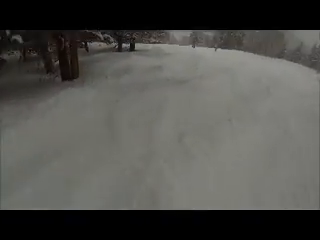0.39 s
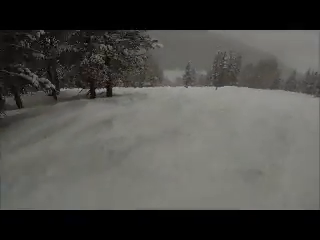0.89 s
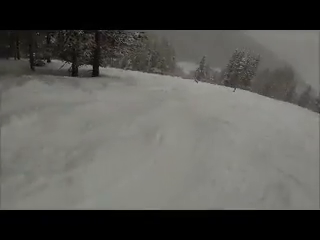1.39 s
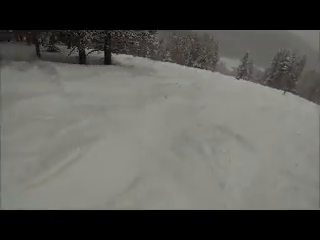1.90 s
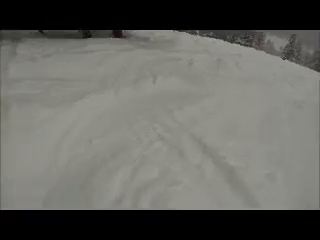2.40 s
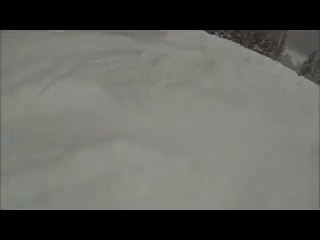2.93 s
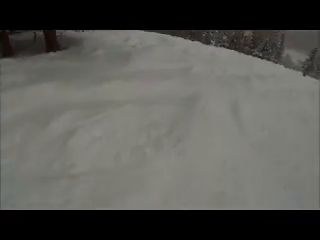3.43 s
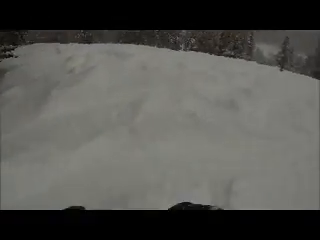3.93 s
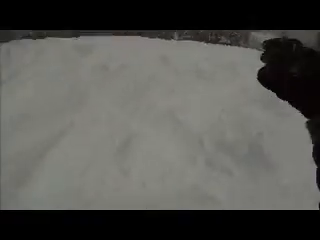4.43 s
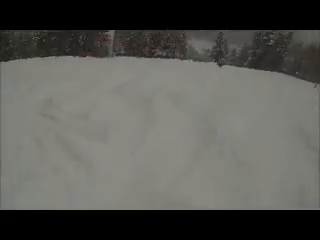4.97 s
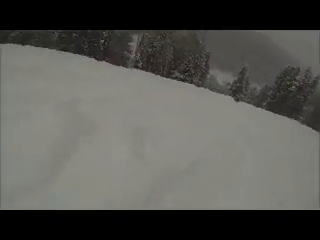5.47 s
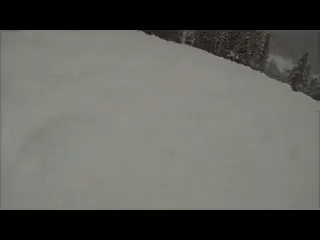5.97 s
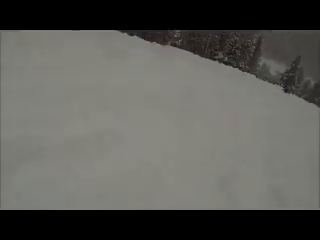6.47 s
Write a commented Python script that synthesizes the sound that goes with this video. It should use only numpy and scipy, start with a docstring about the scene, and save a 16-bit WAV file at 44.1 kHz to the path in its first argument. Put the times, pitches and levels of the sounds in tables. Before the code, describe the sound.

Faint boxy snow hiss and crackling flake ticks under low wind rumble, broken by a hard plastic knock and a later heavy thud.

```python
"""A rider slides down a soft slope in falling snow, heard by a helmet camera shut in a plastic housing.
Throughout, snow hisses as filtered noise, air rumbles as swelling low noise and flakes tick as short bursts.
The ride opens with two jolts in a gust; hard knocks and scrapes follow just after 1 s, and again near 2.9 s.
The strongest jolt, a decaying gliding sine, lands near 4.7 s among scrapes of uneven noise; a light rub follows
near 5.2 s and faint jolts near 6.3 s. The case's resonances colour the ticks, scrapes and hiss."""
import sys
import numpy as np
from scipy import signal
from scipy.fft import rfft, irfft
from scipy.io import wavfile
from scipy.ndimage import uniform_filter1d

SR = 44100
rng = np.random.default_rng(int(sys.argv[2]) if len(sys.argv) > 2 else 0)


def volts_from_decibels(level):
    """Turn decibel levels (scalar or array-like) into linear amplitude factors."""
    exponent = np.asarray(level, float) / 20
    return 10 ** exponent


def store_pcm(level_fs):
    """Save levels as 16-bit WAV."""
    pcm = np.round(np.clip(level_fs, -1, 1) * 32767).astype(np.int16)
    wavfile.write(sys.argv[1], SR, np.atleast_2d(pcm).T)


N = 291060  # samples, 6.6 s

# Relative spectral density of the closed case's response: f/Hz, level/dB [dB per Hz]
CASE_RESPONSE = [(180, -29.5), (300, -3.5), (996, -10), (1310, 4), (1650, -3.5), (2290, 2.5), (3980, -14),
                 (5010, -10), (5660, -20.5), (6020, -35.5), (6310, -20.5), (6920, -15.5), (9700, -13.5),
                 (11000, -18.5), (11800, -98), (15400, -100), (22000, -120)]


def ticks():
    """Impact excitation: each tick is a sharp tap and a short crumble, its hardness setting the ranges rung."""
    # Clear ticks and knocks on the shell: t/s, energy level/dB, low ring/dB and hard edge/dB
    # (both relative to the energy level), crumble time/ms (held to 0.1-4 ms for the crumble)
    clear_ticks = [(.0263, -24, -2, -11, 0.71), (.0415, -21, -21, -9, 1), (.0561, -18.5, -16, -3, .84),
                   (.0687, -19.5, -5, -27, 0.94), (.1473, -21, -26, -23, 2.7), (.191, -24.5, -19, -4, .9),
                   (.2275, -24.5, -13, -8, .76), (.3002, -24.5, -2, -14, 0.76),
                   (.328, -20.5, -14, -19.5, 0.68), (.3775, -37, 11, -24, 1.2), (.4909, -18, -13, -18, .5),
                   (.4975, -22.5, -6, -11, 0.61), (.528, -24.5, -4, -27, 1.4), (.594, -17.5, -4, -25, 2.1),
                   (.6081, -13.5, -6.5, -31, 0.82), (.6674, -22.5, -5, -28, .76),
                   (.7211, -24.5, -1, 2, 1.5), (.745, -18, -29, -5, 1.1), (.802, -19.5, -19, -14, 1.8),
                   (.8523, -16, -8, -37, 0.78), (.87, -26.5, 6, -26, .8), (.9101, -22.5, -5, -7, 1.5),
                   (.9393, -24, -2, 5, 1.05), (.9675, -25, 1, -4, 1.2), (.9823, -22, -2, -19, 2),
                   (1.0337, -20, -8, -7, .55), (1.0374, -19.5, -9, -7.5, 1.2),
                   (1.0648, -13, -18, -21, 0.69), (1.089, -25, 1, -13, 0.96), (1.114, -6.5, -14, -30, 0.75),
                   (1.1222, 1.5, -13, -39, 0.18), (1.1616, 11.2, -11, -25, .27), (1.1648, -3, -8, -14, 1.2),
                   (1.223, -19, -19, -20, .27), (1.243, -19.5, -1.5, -11, 2.2), (1.2855, -10, 6, -25, .78),
                   (1.3121, -25.5, -4, -12, 0.59), (1.3948, -29, -18, -4, 0.55), (1.482, -28, -21, 3, 1.5),
                   (1.5679, -22.5, -11, -8, 0.74), (1.6826, -26.5, -6, -19, .6),
                   (1.7506, -22, -27, -4, .57), (1.763, -22, -27, -26, 0.5), (1.7914, -21, -11, -23, 2.1),
                   (1.808, -19.5, -13, -13, 4.5), (1.8432, -26, -3, 0, 0.77), (1.8927, -28, 3, -3, 1.2),
                   (1.931, -25, -7, 0, 0.95), (1.96, -24, -9, -22, .55), (2.1337, -22, -7, -7, 0.85),
                   (2.151, -17.5, -1, -6.5, 2.5), (2.1879, -28.5, -12, -5, .74),
                   (2.2648, -28, -1, -26, 2.3), (2.3202, -24, -9, -5.5, 1.1), (2.3809, -28, -10, 4.5, .46),
                   (2.51, -20.5, -15, -5.5, 1.8), (2.5336, -22, 6.5, -42, 1.7),
                   (2.6063, -12.5, -15, -32, 1.2), (2.6452, -26.5, -4.5, -15, .42),
                   (2.6744, -28, -18, 0.5, 0.55), (2.9001, -2, 1.5, -44, 0.69), (3.01, -27, -8, -9, 0.68),
                   (3.0677, -22, -18, -23, 0.99), (3.1035, -31, -37, 2.5, .21),
                   (3.1271, -24.5, -36, -3, .57), (3.151, -24.5, -20, 4, 0.71), (3.1636, -25, -20, -7, 1),
                   (3.1709, -19.5, -10, -8, 0.76), (3.1774, -22.5, -20, -7, 0.83),
                   (3.3377, -19, -7.5, -6.5, 1.7), (3.3687, -16.5, -17, -26, 0.9),
                   (3.426, -26, 2.5, -15, 3), (3.434, -20, -16, -5, 1.8), (3.446, -25, -26, -4, 1.2),
                   (3.4527, -24.5, -2, 1, 1.5), (3.487, -25.5, -14, -6, .67), (3.557, -18, -2.5, -5, 0.89),
                   (3.6346, -20.5, -30, -9, 0.51), (3.8359, -28, -1, -5, 1.7),
                   (3.8475, -14, -28, -13.5, 1.1), (3.9159, -29, 0, 3.5, 1.6), (3.926, -34, 14.5, 0, 1.6),
                   (3.9584, -16.5, -15, -10, .8), (3.9724, -27, 1, -.6, 1.1), (4.0319, -27, -21, -12, 1.2),
                   (4.0721, -25.5, -12, -21, 1.1), (4.1144, -25, 3, -38, 1.3), (4.1678, -24, -9, 1, 1.1),
                   (4.2036, -23.5, -8, -43, 1), (4.2723, -15.5, -8, -51, .83), (4.2806, -28, -16, -12, .65),
                   (4.3289, -26, -45, -26, 0.84), (4.3621, -12, -11.5, -12.5, 3.4),
                   (4.4042, -15.5, -9.5, -16, 1), (4.4493, -21.5, -8, -9, 1.4), (4.4761, -20, -11, -11, .2),
                   (4.4798, -23.5, 10.5, -18, 1), (4.5574, -26, -19, -12, .7),
                   (4.5851, -17.5, -10, -30, 1.1), (4.605, -8, 2.5, -30, .36), (4.757, -39.5, -7, 12.5, .9),
                   (4.7768, -16, -8, -15, 1.4), (4.8164, -22.5, -23, -2, 0.64),
                   (4.832, -24.5, -26, -22, 1.5), (4.959, -34, -11, -17, 1.2), (5.0054, -31, -8, -15, 1.2),
                   (5.0132, -31.5, -11, 1, 0.62), (5.105, -30.5, -14, -13, .95),
                   (5.1868, -32.5, -2, -3.5, .9), (5.2191, -35, -10, 8, 1.5), (5.23, -18, -11, -11, 1.6),
                   (5.241, -24.5, -17, -3, 0.39), (5.2895, -27, -12, -5, 2.2), (5.3113, -22, -7, -12, 0.43),
                   (5.3325, -22.5, -16, -14, .43), (5.363, -29, -17, -1, .3), (5.4162, -32, -6, -3, .74),
                   (5.4371, -20.5, -8, -19, .97), (5.5217, -27.5, -4.5, -8, 1.1),
                   (5.6176, -26, -1, -5, 1.1), (5.6325, -25, -7, -4, 0.24), (5.653, -16, -26, -22, 1.16),
                   (5.7401, -20, -9, -15, 1.2), (5.8615, -19.5, -23.5, -17, 1.5),
                   (5.894, -25.5, -5, -2, 1.2), (5.92, -29, -10, -4, 1.6), (5.959, -27, -12, -22, 1.3),
                   (6.1394, -19.5, -26, -25, 0.49), (6.3, -24, 4, -52, 1.6), (6.3148, -33, 16, -27, .84),
                   (6.375, -26.5, 11.5, -27, 1.3), (6.3905, -11.5, -16, -30, 0.82),
                   (6.3993, -21, -14, 3, 0.26), (6.4126, -19.5, -18, -11, .76),
                   (6.4637, -20.5, -15, -17, 0.49), (6.5467, -24, -13, -19, 0.82),
                   (6.5576, -27, 2, 1.5, 0.26)]
    start_s, energy_db, low_db, edge_db, length_ms = np.vstack([clear_ticks, flakes()]).T[:, :, None]
    # Soft, weak blows carry more dull thud
    dull_db = -17.5 + 0.83 * low_db - 0.43 * energy_db

    k = np.arange(512)
    t = 1000 * k / SR / np.clip(length_ms, 0.1, 4)  # in crumble times
    crumble = rng.standard_normal(t.shape) * t * np.exp(-t)
    crumble = crumble / np.linalg.norm(crumble, axis=1, keepdims=True)
    even_split_ms = 0.73  # shorter ticks are mostly one sharp tap
    tap_share = 1 / (1 + (length_ms / even_split_ms) ** 2)  # of the energy
    burst = np.sqrt(1 - tap_share) * crumble + np.sqrt(tap_share) * (k == 8)

    # Bursts begin 36 samples ahead of their listed times
    where = np.clip((start_s * SR).astype(int) + k - 36, 0, N - 1)
    gains = range_gains(energy_db, dull_db, low_db, edge_db)
    return ring([np.bincount(where.ravel(), (g * burst).ravel(), N) for g in gains])


def flakes():
    """Poisson-like scatter: fainter ticks at independent random moments, strengths, colours and lengths."""
    flakes_per_s = 45
    count = int(flakes_per_s * N / SR)
    start_s = rng.random(count) * N / SR
    strength, low, edge, length = rng.standard_normal((4, count))
    energy_db = -34.5 + 3.5 * strength
    low_db = -8.5 + 6 * low
    edge_db = -7 + 6 * edge
    length_ms = 0.8 * np.exp(0.43 * length)
    return np.transpose([start_s, energy_db, low_db, edge_db, length_ms])


def range_gains(main_db, dull_db, low_db, edge_db):
    """Modal participation: gains of the five ranges; main blow and hard edge both ring the microphone port."""
    port = np.hypot(volts_from_decibels(-11), volts_from_decibels(edge_db - 12))
    return [volts_from_decibels(main_db) * g for g in (1, volts_from_decibels(dull_db), volts_from_decibels(low_db), volts_from_decibels(edge_db), port)]


def ring(trains):
    """Linear response: each range of the case filters its own blows and passes unit energy per unit tap."""
    # Ranges main, dull, low, edge, microphone port: lower f/Hz, upper f/Hz
    case_ranges = [(1700, 3300), (300, 1000), (1000, 1700), (3400, 8300), (9000, 10700)]
    impulse = 1.0 * (np.arange(4096) == 0)
    tap = colour(impulse, CASE_RESPONSE)
    out = 0
    for train, (lo_hz, hi_hz) in zip(trains, case_ranges):
        rung = band(colour(train, CASE_RESPONSE), lo_hz, hi_hz)
        out = out + rung / np.linalg.norm(band(tap, lo_hz, hi_hz))
    return out


def jolts():
    """Damped oscillation: each blow's pitch glides to the sway of the mount; quick blows also ring its arm."""
    # Jolts through the mount: t/s, level/dB (before onset and decay), first f/Hz, decay time/ms,
    # direction of the push (+1 or -1)
    jolt_rows = [(.002, -21.5, 46.3, 6.9, -1), (.064, -22.5, 127, 21, -1), (1.092, -30, 55, 51, -1),
                 (1.16, -21, 133, 9.3, -1), (1.184, -27.5, 50, 19, 1), (1.285, -32, 157, 8.3, -1),
                 (1.305, -31, 35.3, 19, 1), (2.534, -31.5, 200, 25, 1), (2.743, -34.5, 45, 34, -1),
                 (2.768, -31.5, 70.5, 40, -1), (2.9002, -30, 455, 6.5, -1), (2.902, -19.5, 242, 26.5, -1),
                 (3.918, -37, 207, 31, 1), (4.516, -27.5, 89, 52, 1), (4.559, -34, 45, 60, 1),
                 (4.605, -24, 223, 29, -1), (4.617, -23, 130, 10, -1), (4.639, -25, 40, 29, 1),
                 (4.664, -6.5, 60.4, 14, -1), (4.712, -38, 300, 15, 1), (6.31, -43, 250, 13, 1),
                 (6.378, -41, 243, 39, 1)]
    mount_hz, glide_s, rise_s = 37.47, 0.0076, 0.001
    arm_hz, arm_decay_ms, arm_db, quick_hz = 123.5, 31, -16, 150  # the arm is stiffer than the mount
    out = np.zeros(N)
    for start_s, db, first_hz, decay_ms, sign in jolt_rows:
        t = np.clip(np.arange(N) / SR - start_s, 0, 1)
        # Phase in turns of a frequency relaxing from first_hz to mount_hz
        turns = mount_hz * t + (first_hz - mount_hz) * glide_s * (1 - np.exp(-t / glide_s))
        envelope = (1 - np.exp(-t / rise_s)) * np.exp(-1000 * t / decay_ms)
        out += sign * volts_from_decibels(db) * envelope * np.sin(2 * np.pi * turns)

        quickness = 1 / (1 + (quick_hz / first_hz) ** 2)
        arm = np.sin(2 * np.pi * arm_hz * t) * np.exp(-1000 * t / arm_decay_ms)
        out += sign * quickness * volts_from_decibels(db + arm_db) * arm
    return out


def scrapes():
    """Stick-slip friction: uneven slips swell or die away until the housing lets go of its mount."""
    # Rubs of the housing in its mount: start t/s, end t/s, first level/dB, last level/dB (main range)
    rubs = [(0.395, .425, -59, -59), (0.88, 0.894, -46, -51), (1.15, 1.163, -47, -22),
            (1.164, 1.182, -25, -45.5), (1.253, 1.297, -48, -59), (2.866, 2.902, -44.5, -36.5),
            (2.904, 2.929, -35, -59.5), (4.582, 4.607, -57, -44), (4.602, 4.623, -33.5, -37),
            (4.622, 4.642, -37.5, -27), (4.645, 4.652, -39, -48), (4.651, 4.672, -36.5, -37),
            (4.675, 4.699, -63, -53), (4.704, 4.733, -44, -41), (4.722, 4.742, -52, -48),
            (5.243, 5.256, -43, -68)]
    light_rub_db = -48
    t, trains = np.arange(N) / SR, 0
    slips = unit_rms(volts_from_decibels(3.5 * walk(450)) * rng.standard_normal(N))
    for start, end, first_db, last_db in rubs:
        db = np.interp(t, [start, end], [first_db, last_db])
        contact = np.clip(np.minimum(t - start, end - t) / 0.0015, 0, 1)  # 1.5 ms ramps
        # Harder pressure rings brighter: the two lower ranges lose share
        press_db = max(first_db, last_db) - light_rub_db
        gains = range_gains(0, -0.7154 * press_db, -0.12 * press_db, -27)
        trains = trains + np.outer(gains, volts_from_decibels(db) * contact * slips)
    return ring(trains)


def glide(hiss_db):
    """Broadband friction noise: snow hisses under the rider amid a patter of flakes too small to tell apart."""
    hits_per_s, crumble_s = 300, 0.0044
    hits = (rng.random(N) < hits_per_s / SR) * volts_from_decibels(2.43 * rng.exponential(size=N).clip(0, 2.5))
    grit, out = rng.standard_normal(N), 0
    for lo_hz, hi_hz in [(100, 1000), (1000, 1700), (1700, 3500), (3500, 6000), (6000, 8500), (8500, 11500)]:
        # Each flake has its own hardness: a random level in every band
        blows = hits * volts_from_decibels(6.4 * rng.standard_normal(N))
        crumble = signal.lfilter([1], [1, -np.exp(-1 / (crumble_s * SR))], blows)
        hiss = volts_from_decibels(2.2 * walk(25)) * rng.standard_normal(N)
        out = out + band(unit_rms(hiss) + unit_rms(crumble * grit), lo_hz, hi_hz)
    return volts_from_decibels(hiss_db) * unit_rms(colour(out, CASE_RESPONSE))


def buffet(buffet_db):
    """Turbulent forcing: air shakes the mount, its course moving the deep rumble more than the upper part."""
    # Relative spectral density of the air noise: f/Hz, level/dB [dB per Hz]
    air_spectrum = [(8.8, -31), (15, 3), (46, 2), (82, -11.5), (125, -7), (175, -15.5), (229, -16.5),
                    (271, -14.5), (424, -39), (900, -27), (1170, -58), (1980, -120)]
    air = unit_rms(colour(rng.standard_normal(N), air_spectrum))
    deep, upper = band(air, 11.7, 64), band(air, 69.8, 1560)
    middle_db = np.median(buffet_db)
    deep_db = buffet_db + 1.9 * walk(13)
    upper_db = middle_db + 0.46 * (buffet_db - middle_db) + 1.95 * walk(30)
    return volts_from_decibels(deep_db) * deep + volts_from_decibels(upper_db) * upper


def unit_rms(x):
    """Normalization by mean power: scale to rms 1."""
    return x / np.sqrt(np.mean(x ** 2))


def colour(x, points):
    """Minimum-phase filtering: the folded cepstrum of a (Hz, dB) outline gives its causal response."""
    hz, db = np.transpose(points)
    size = 2 ** 14
    grid_hz = np.arange(size // 2 + 1) * SR / size
    log_gain = np.interp(np.log(grid_hz + 1), np.log(hz), db) * np.log(10) / 20
    cepstrum = np.fft.irfft(log_gain)
    cepstrum[1:size // 2] *= 2
    cepstrum[size // 2 + 1:] = 0
    response = irfft(np.exp(rfft(cepstrum)))
    return signal.fftconvolve(x, response)[:len(x)]


def band(x, lo_hz, hi_hz):
    """Band limitation: a steep Butterworth band-pass."""
    return signal.sosfilt(signal.butter(4, [lo_hz, hi_hz], "band", fs=SR, output="sos"), x)


def walk(rate_hz):
    """Random modulation: Gaussian levels held 1 / rate_hz s and smoothed twice; spread near 1."""
    k = int(SR / rate_hz)
    held = np.repeat(rng.standard_normal(N // k + 1), k)
    return unit_rms(uniform_filter1d(uniform_filter1d(held, k), k)[:N])


def scene():
    """Superposition: the ride's course sets hiss and buffet, and the blows add on top."""
    # Course of the ride: t/s, hiss level/dB, buffet level/dB (before its random swells)
    ride_course = [(0, -51.5, -34.5), (.18, -58, -55), (.45, -53.5, -35), (.7, -55.5, -52.5),
                   (1.08, -49, -42), (1.2, -53, -43), (1.4, -55, -57), (1.58, -54.5, -48),
                   (1.76, -52.5, -56), (2.05, -56, -50.5), (2.35, -56, -50), (2.65, -56.5, -50.5),
                   (2.96, -53, -42.5), (3.29, -55.5, -56.5), (3.55, -58, -49), (3.8, -57, -57),
                   (4.05, -59.5, -49.5), (4.43, -53.5, -48), (4.59, -55, -37), (4.78, -55.5, -51),
                   (5.05, -61, -53), (5.35, -55, -58.5), (5.65, -56.5, -49.5), (5.9, -57.5, -57),
                   (6.1, -54.5, -51.5), (6.35, -52.5, -50.5), (6.6, -53.5, -52.5)]
    time_s, *columns = np.transpose(ride_course)
    hiss_db, buffet_db = (np.interp(np.arange(N) / SR, time_s, c) for c in columns)
    mix = ticks() + jolts() + scrapes() + glide(hiss_db) + buffet(buffet_db)
    return mix[None]


def band_limit(x):
    """A steep low-pass at the top of the band."""
    return signal.sosfilt(signal.butter(12, 12000, fs=SR, output="sos"), x)


def record(dry):
    """Amplitude limiting: peaks beyond full scale are clipped."""
    mix = np.clip(dry, -1, 1)
    return band_limit(mix)


dry = scene()
out = record(dry)
store_pcm(out)
```